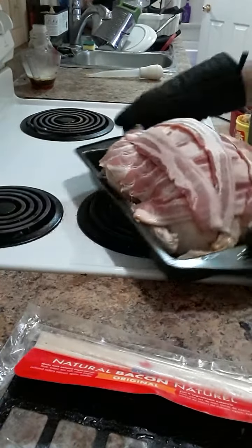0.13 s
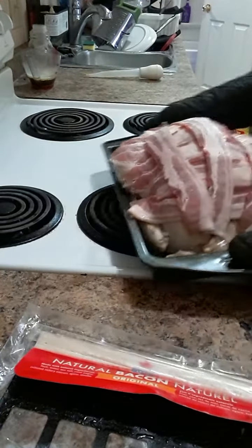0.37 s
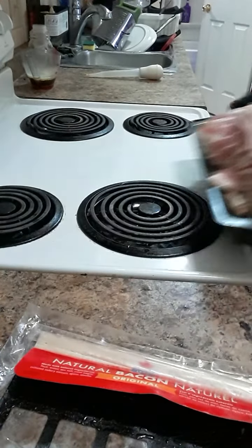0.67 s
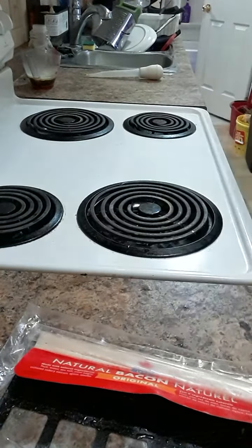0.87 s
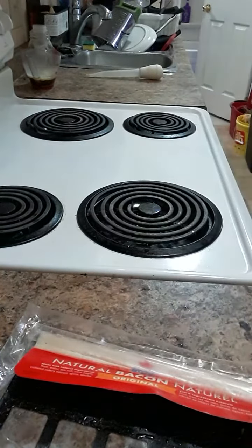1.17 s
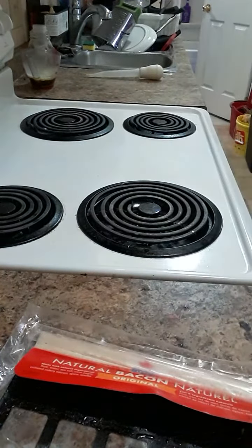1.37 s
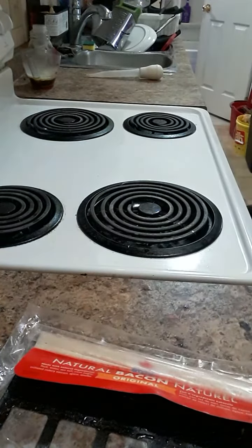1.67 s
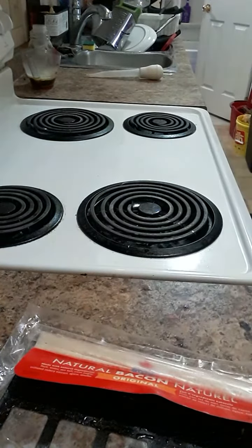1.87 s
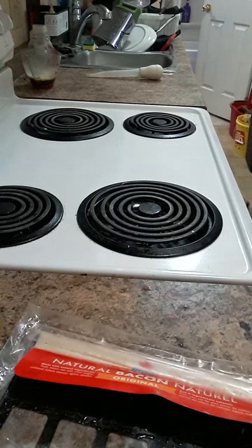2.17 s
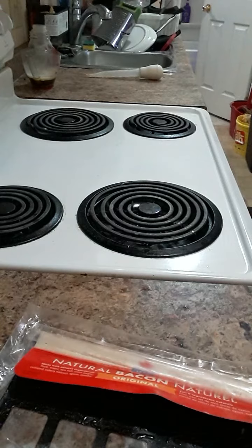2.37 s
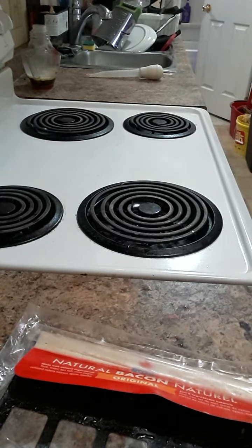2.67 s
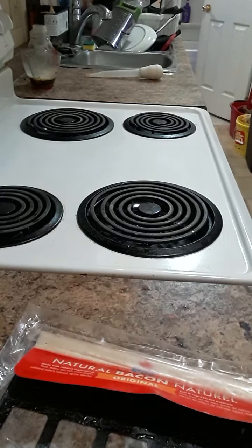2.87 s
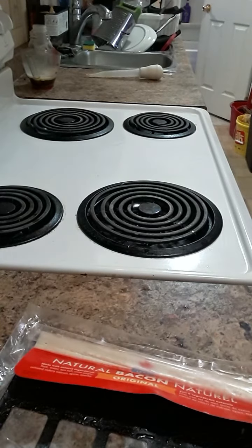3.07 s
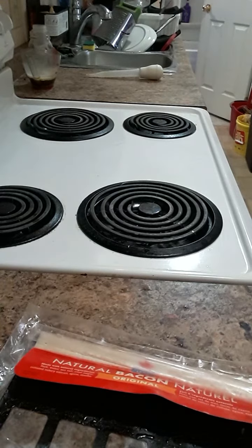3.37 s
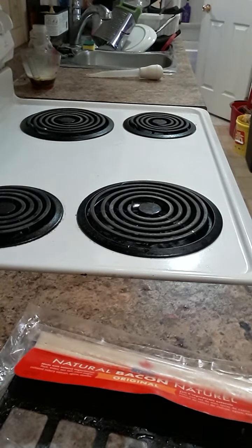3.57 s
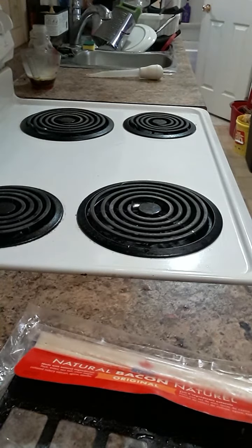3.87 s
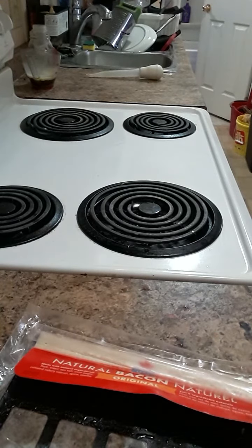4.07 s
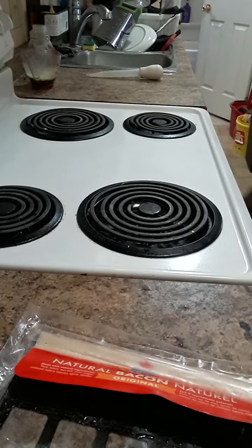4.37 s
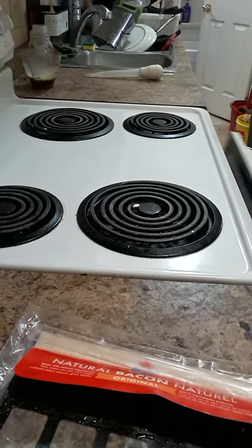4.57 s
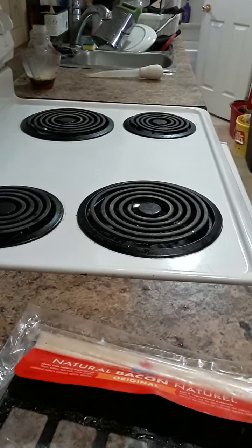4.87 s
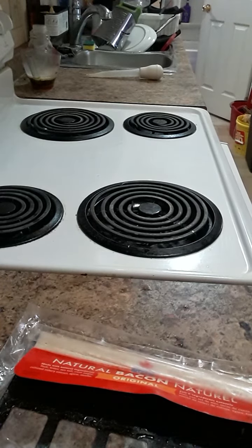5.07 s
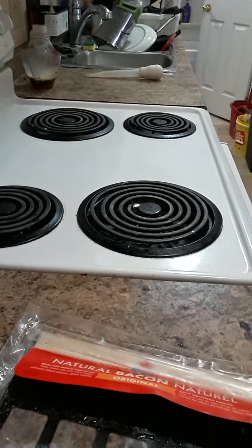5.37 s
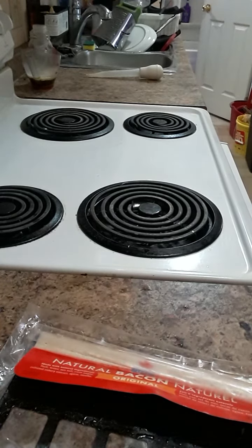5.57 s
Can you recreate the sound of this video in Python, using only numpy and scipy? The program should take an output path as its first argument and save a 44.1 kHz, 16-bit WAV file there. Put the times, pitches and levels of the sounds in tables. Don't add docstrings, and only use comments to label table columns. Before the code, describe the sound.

Close phone recording in stereo in a small kitchen with faint appliance hum. A metal pan drags gratingly off a stove coil, with a blunt counter tap. After a quiet gap it clatters onto the oven rack, thin steel ringing and the oven box booming, then slides with a soft hiss. Light ticks precede the oven door banging shut in several quick blows, whose panels ring briefly.

```python
import sys
import numpy as np
from scipy import signal
from scipy.fft import rfft, irfft, next_fast_len
from scipy.io import wavfile
from scipy.ndimage import uniform_filter1d

SR = 44100
rng = np.random.default_rng(int(sys.argv[2]) if len(sys.argv) > 2 else 0)


def output_pcm(signal):
    pcm = np.clip(np.atleast_2d(signal).T, -1, 1) * 32767
    wavfile.write(sys.argv[1], SR, np.round(pcm).astype(np.int16))


def decibels_to_gain(level_db):
    exponent = np.asarray(level_db, float) / 20
    return 10 ** exponent


N = 251811


def evened(x):
    return x / np.sqrt(np.mean(x ** 2) + 1e-20)


def read(points, at, column=1):
    table = np.transpose(points)
    return np.interp(np.log(at + 1), np.log(table[0] + 1), table[column])


def curve(rows):
    s, db = np.transpose(rows)
    return np.interp(np.arange(N) / SR, s, db, left=-120, right=-120)


def colour(x, db_of_hz):
    log_gain = np.log(decibels_to_gain(db_of_hz(abs(np.fft.fftfreq(4096, 1 / SR)))))
    taps = np.fft.ifft(np.exp(np.conj(signal.hilbert(log_gain)))).real[:2048]
    return signal.oaconvolve(x, taps.reshape((1,) * (x.ndim - 1) + (-1,)), axes=-1)[..., :N]


def split(x, hz):
    low = signal.sosfilt(signal.butter(2, hz, fs=SR, output="sos"), x)
    high = -signal.sosfilt(signal.butter(2, hz, "high", fs=SR, output="sos"), x)
    return low, high


def chatter(per_s, spread_db):
    size = decibels_to_gain(spread_db * np.minimum(rng.exponential(1, N), 4)) * rng.choice([-1., 1.], N)
    return evened(size * (rng.random(N) < per_s / SR))


def strike(force, rings):
    spot = rng.integers(0, len(rings), N) == np.arange(len(rings))[:, None]
    first, last = np.flatnonzero(force)[[0, -1]]
    size = next_fast_len(last + 1 - first + rings.shape[-1])
    blows = rfft((force * spot)[:, first:last + 1], size)[:, None]
    out = np.zeros((2, 2 * N))
    out[:, first:first + size] = irfft((blows * rfft(rings, size)).sum(0), size)
    return out[:, :N]


def ring(hz, db, t60):
    t = np.arange(SR // 2)[:, None] / SR
    apart = np.pi * np.clip(hz / 2460, 0, 1) * rng.uniform(-0.97, 1, len(hz))
    turns = 2 * np.pi * hz * t
    fade = decibels_to_gain(db - 60 * t / t60) / np.sqrt(t60)
    both = np.array([(fade * np.sin(turns)).sum(1), (fade * np.sin(turns + apart)).sum(1)])
    both = split(both, 0.61 * min(hz))[1]
    return both / np.linalg.norm(both[0])


# (frequency [Hz], left-right likeness [0..1])
PORT_LIKENESS = [(60, 1.), (300, 0.82), (550, 0.75), (1100, 0.75), (1650, 0.15), (5000, 0.029)]


def two_port_noise(same, a, b, c, d):
    left = a + 1j * b
    return left, same * left + np.sqrt(1 - same ** 2) * (c + 1j * d)


def steel(sheet, modes, count=6):
    hz = np.fft.rfftfreq(1024, 1 / SR)[:, None]
    same = np.clip(read(PORT_LIKENESS, hz), 0, 1)
    z = np.stack(two_port_noise(same, *rng.standard_normal((4, count, 513, 40))), axis=1)
    bumps = sum(decibels_to_gain(db - 8.5) / (1 + (2 * (hz - f) / width) ** 2) for f, width, db in modes)
    z = z * decibels_to_gain(read(sheet, hz)) * (1 + bumps)
    still = signal.istft(z, nperseg=1024, noverlap=768)[1][..., 1024:]
    hz, t, z = signal.stft(still, SR, nperseg=128)
    t60 = read(sheet, hz, column=2)[:, None]
    rings = signal.istft(z * decibels_to_gain(-60 * t / t60) / np.sqrt(t60), SR, nperseg=128)[1]
    rings = split(split(rings, 132)[1], 125)[1]
    return rings / np.sqrt((rings[:, 0] ** 2).sum(1).mean())


def clatter(hits, rise_s, sheet, modes, box, per_s, crest_db, hard_hz, edge_db):
    t = np.arange(SR // 2) / SR
    power = np.zeros((4, N + SR))
    for s, db, weight_db, hard_db, t60 in hits:
        shape = (1 - np.exp(-t / rise_s)) ** 2 * decibels_to_gain(-120 * t / t60)
        share_db = np.array([[0], [hard_db + 2.5], [2.1 * hard_db + edge_db], [weight_db + 0.5]])
        at = round(s * SR)
        power[:, at:at + len(t)] += decibels_to_gain(2 * (db - crest_db + share_db)) * shape / shape.max()
    clicks = chatter(per_s, spread_db=3.5)
    clicks[np.round((np.transpose(hits)[0] + rise_s) * SR).astype(int)] = 6.4
    force = np.sqrt(power[:, :N]) * clicks
    low, high = split(steel(sheet, modes), hard_hz)
    bodies = low, *split(high, 10000), ring(*np.transpose(box))[None]
    return sum(strike(f, b / np.linalg.norm(b[0, 0])) for f, b in zip(force, bodies))


# (time [s], peak [dB], weight into the box [dB], treble hardness [dB], t60 [s])
DOOR_HITS = [(4.556, -30.5, -2, -23, 0.34), (4.572, -28, -3, -10.5, 0.13), (4.586, -25.5, -4.5, -4, 0.056),
             (4.625, -37, -3, -22, .25), (4.66, -43, -3, -22, .15), (4.714, -25, -33, -19, 0.3),
             (4.733, -24.5, -20, -21, 0.18), (4.781, -10, -8, -13, 0.12), (4.791, -21, -14, -2, .1),
             (4.801, -13, -14, 1, 0.27), (4.817, -23.5, -16, 5.5, 0.18), (4.844, -13, -8, -17, 0.36),
             (4.896, -23, -12, -1, .1), (4.908, -14.5, -11, -1, 0.18), (4.93, -19, -6, -3.5, 0.27),
             (4.959, -21.5, -21, 3.5, 0.045)]
# (frequency [Hz], level [dB], t60 [s])
DOOR_STEEL = [(190, -5, 0.25), (292, 5.5, 0.17), (597, 8.5, 0.21), (1080, 6, 0.099), (2480, 0, 0.057),
              (5430, -0.5, 0.098), (9700, -1.5, 0.087), (16400, -12.5, 0.017)]
# (frequency [Hz], width [Hz], level [dB])
DOOR_MODES = [(470, 24, -12), (770, 40, -3), (910, 33, -12), (1160, 36, -1), (1750, 110, 9), (2250, 25, 6),
              (2350, 40, 4), (2940, 58, 11), (3730, 33, 11), (5230, 40, 3), (6120, 68, 7), (7285, 35, -2),
              (11900, 60, 3), (12783, 30, 6)]
# (frequency [Hz], level [dB], t60 [s])
FRAME = [(72.6, -8, 0.07), (92, 3.5, 0.15), (111, 4, 0.11), (124, 1, 0.13)]
# (frequency [Hz], level [dB], t60 [s])
BOX = [(157, -3, 0.35), (230.5, 4, 0.49), (263, 4.5, 0.11), (291.4, 7, 0.22), (307.5, 4.5, 0.2),
       (327, 0.5, 0.32), (390, -5, 0.52)]


def door_bang():
    return clatter(DOOR_HITS, 0.0035, DOOR_STEEL, DOOR_MODES, FRAME + BOX,
                   per_s=2600, crest_db=10, hard_hz=2830, edge_db=2)


def door_puff():
    start_s, length_s = 4.7812, 0.0017
    u = np.maximum(np.arange(N) / SR - start_s, 0) / length_s
    return decibels_to_gain(-8) * 2 * u * (1.5 - u) * np.exp(-u)


# (time [s], peak [dB], weight into the shelf [dB], treble hardness [dB], t60 [s])
PAN_HITS = [(1.95, -26, -1.5, -4.5, 0.4), (1.971, -21, -24, -3.5, 0.12), (1.989, -24.5, -21, -10, 0.39),
            (2.038, -26.5, -20, -21, .16), (2.065, -24.5, -9, -10, 0.43), (2.111, -20.5, -17, -6, 0.15),
            (2.133, -26, -24, -26, 0.089), (2.147, -26, -10, -9, 0.1), (2.163, -28, -10, -22, 0.092),
            (2.178, -31.5, -15, -12, .1), (2.191, -31, -22, -20, 0.33), (2.229, -32, -11, -11.5, 0.084),
            (2.267, -37, -18, -36, 0.48), (2.437, -36, -1, -16, 0.03), (2.903, -42, 5, 3.5, 0.084),
            (2.92, -47.5, -7, 1, .15)]
# (frequency [Hz], level [dB], t60 [s])
PAN_STEEL = [(250, 4, 0.031), (463, 4, 0.42), (1080, 2.5, 0.32), (1980, -1, 0.074), (3200, -5.5, 0.1),
             (4930, -5.5, 0.049), (8400, -8, 0.054), (15600, -19.5, 0.031)]
# (frequency [Hz], width [Hz], level [dB])
PAN_MODES = [(507, 28, 2), (707, 39, 9), (800, 28, 0.5), (860, 23, -6), (1065, 27, 9), (1380, 34, -1),
             (1700, 35, 4), (1880, 26, -7), (2650, 58, 3), (4040, 93, 5), (5650, 54, -23)]
# (frequency [Hz], level [dB], t60 [s])
SHELF = [(120.3, 2, 0.83), (146.7, 1.5, 0.26), (223, -11, 0.2), (282, -12, 0.39), (331.3, 4, 0.18),
         (403, -4, 0.18)]


def pan_landing():
    return clatter(PAN_HITS, 0.0067, PAN_STEEL, PAN_MODES, SHELF,
                   per_s=1800, crest_db=8.5, hard_hz=2700, edge_db=-3.5)


# (time [s], peak [dB], weight into the box [dB], treble hardness [dB], t60 [s])
SMALL_HITS = [(.598, -48, -37, -17, 0.29), (1.107, -57.5, -18, 0.5, 0.18), (1.59, -50, -7, -24, 0.26),
              (2.69, -40.5, -9, -11, 0.088), (2.862, -48, 6.5, -1, 0.21), (3.335, -48.5, -2, -16, 0.082),
              (3.582, -49, -26, -6.5, .18), (3.769, -39, -10.5, -11, 0.14), (4.161, -38.5, -24, -7, 0.07),
              (4.272, -45, -8, -4, .11), (4.29, -48, -16, -8.5, 0.47), (5.154, -54, 12, 3.5, 0.16),
              (5.592, -50, 4, -1, 0.08), (5.664, -42, -18, -4.5, 0.2)]


def small_bumps():
    return clatter(SMALL_HITS, 0.0039, PAN_STEEL, PAN_MODES, BOX,
                   per_s=5000, crest_db=8.0, hard_hz=2630, edge_db=0.5)


# (time [s], level [dB], frequency [Hz])
CLINKS = [(.404, -40, 469), (.432, -53, 3140), (1.258, -54, 995), (1.587, -48, 1200), (1.59, -50, 1500),
          (1.592, -52, 1740), (1.773, -47.5, 605), (1.96, -32.5, 507.3), (1.975, -29.5, 1065),
          (1.975, -32, 2035), (2.124, -29, 1040), (2.126, -29.5, 796), (2.14, -32, 850), (2.035, -35, 600),
          (2.93, -46.5, 3740), (3.34, -51, 470), (3.34, -56, 898), (3.588, -51.5, 1700), (3.775, -48, 702),
          (3.778, -50, 800), (3.775, -48, 1093), (3.959, -63, 2700), (4.301, -65, 1750),
          (4.557, -34.5, 510), (4.558, -37, 800), (4.569, -38, 386), (4.6, -38, 631), (4.57, -35, 1080),
          (4.557, -53, 1600)]
# (time [s], level [dB], frequency [Hz])
BOOMS = [(2.265, -35, 290), (2.859, -42, 159), (3.343, -47, 276), (3.872, -41.5, 121), (4.561, -33.5, 145),
         (4.59, -28, 134), (4.625, -29, 110.4), (4.783, -31, 68), (4.783, -25, 105), (4.798, -20, 263.5),
         (4.556, -35, 250), (4.602, -33, 114), (4.566, -49, 330), (3.778, -45, 141), (4.9, -23, 125),
         (4.59, -35.5, 260), (4.628, -34.5, 160), (1.97, -36, 320), (4.27, -50, 350), (5.09, -45, 230),
         (4.8, -30, 270), (5.682, -42, 108), (4.842, -25, 108), (4.96, -32, 97), (4.735, -43, 88),
         (4.7, -40, 120), (4.92, -30, 220), (5.27, -45, 280)]
# (time [s], level [dB], frequency [Hz])
TICKS = [(3.8, -55, 2800), (4.599, -48, 2600), (4.558, -52, 1700), (4.653, -54, 1500),
         (0.53, -61, 2400), (0.33, -48, 1050), (3.59, -53, 1150), (3.77, -60, 2900),
         (2.15, -35, 2300), (2.17, -41, 2700), (2.11, -44, 1900), (2.07, -42, 1900),
         (1.99, -46, 2300), (2.915, -54, 2700), (4.716, -44, 1800), (4.716, -38, 1500),
         (4.75, -39, 1900), (3.785, -46.5, 760), (4.17, -66, 3000), (5.59, -54, 1750),
         (5.59, -54, 1100), (5.66, -47, 2000), (5.67, -55, 2700), (5.67, -56, 1700),
         (4.725, -36, 1200)]
# (time [s], level [dB], frequency [Hz])
DOOR_CLINKS = [(4.72, -45, 2820), (4.721, -36.5, 570), (4.802, -30, 3725), (4.805, -35, 5964),
               (4.827, -23, 441), (4.83, -34, 5167), (4.831, -22.5, 1625), (4.839, -29, 2190),
               (4.844, -24, 6090), (4.849, -38, 4952), (4.853, -25, 6406), (4.897, -35, 2196),
               (4.898, -31.5, 915), (4.905, -30, 4980), (4.905, -28.5, 3720), (4.907, -38, 4457),
               (4.911, -29.5, 2050), (4.913, -33, 5609), (4.943, -35, 6233), (4.952, -30, 5178),
               (4.96, -32, 925), (4.966, -43, 5700), (4.79, -30, 2950)]
# (time [s], level [dB], frequency [Hz])
PAN_CLINKS = [(1.971, -33, 3860), (1.993, -43, 4263), (1.996, -34, 2030), (2.022, -45, 2830),
              (2.03, -30, 990), (2.058, -46, 5749), (2.059, -33, 533), (2.109, -49, 6061),
              (2.119, -47, 5727), (2.122, -42, 4060), (1.985, -34, 480), (2.135, -51, 6018),
              (2.234, -43, 1375), (2.254, -47, 1970), (2.265, -41.5, 523), (2.279, -47, 351)]
# (time [s], level [dB], frequency [Hz])
DRAG_CLINKS = [(.001, -42, 3410), (.001, -44, 2450), (0.044, -37, 1870), (.05, -51, 3000),
               (.055, -44, 2300), (.08, -41, 904), (.116, -35, 829), (.187, -43, 1080), (.232, -42, 759),
               (0.362, -39.5, 948), (.398, -52, 2600), (.4, -46, 1524), (.419, -56, 3150)]


def clinks():
    t = np.arange(SR // 4) / SR
    out = np.zeros((2, N + SR))
    rows = CLINKS + BOOMS + TICKS
    rows = rows + [(s, db - 2.0, hz) for s, db, hz in DOOR_CLINKS + PAN_CLINKS + DRAG_CLINKS]
    for (s, db, hz), (detune, beat, side) in zip(rows, rng.random((len(rows), 3))):
        t60 = min(0.13 * (1000 / hz) ** 0.2, 0.14)
        if db < -44 and hz > 900:
            t60 *= 0.5
        apart = np.array([[0], [np.pi * min(hz / 1500, 1) * (2 * side - 1)]])
        second_hz = hz + min(0.053 * hz, 56) * detune
        pair = np.sin(2 * np.pi * hz * t + apart)
        pair = pair + 1.02 * np.sin(2 * np.pi * (second_hz * t + beat) + apart)
        start = round(s * SR)
        out[:, start:start + len(t)] += decibels_to_gain(db - 60 * t / t60) * (1 - np.exp(-t / 0.0014)) * pair
    return out[:, :N]


def scrape(body, per_s):
    sheet = [(hz, db, 0.04) for hz, db in body]
    modes = [(829, 60, 0), (1376, 16, 0), (1870, 94, 0),  # (frequency [Hz], width [Hz], level [dB])
             (2300, 37, 0), (2950, 140, 0), (3430, 40, 0)]
    grains = chatter(per_s, spread_db=3.0)
    return strike(grains, steel(sheet, modes, count=10))


# (time at full pressure [s], level [dB], treble [dB], build [s], let-go [s])
DRAG = [
    (0.001, -38.5, -3.5, .1, 0.23),
    (0.4223, -40, -9, 0.08, 0.023),
    (0.364, -46.5, -14, 0.044, .02),
]
# (frequency [Hz], level [dB])
DRAG_BODY = [(200, -4), (450, -4.5), (850, 9), (1400, 5.5), (2000, -4), (3200, -6.5), (5000, -9),
             (16000, -21.5)]


def drag():
    rubbing = np.roll(scrape(DRAG_BODY, per_s=3000), -SR, axis=1)
    low, high = map(evened, split(rubbing, 2700))
    t, out = np.arange(N) / SR, 0
    for s, db, treble_db, build, let_go in DRAG:
        away = (t - s) / np.where(t < s, build, let_go)
        treble = decibels_to_gain(treble_db + 2.0 - 2.5 * np.minimum(away ** 2, 3))
        out = out + decibels_to_gain(db - 12.5 * away ** 2) * (decibels_to_gain(0.5) * low + treble * high)
    return out


# (frequency [Hz], level [dB], swell length [s], t60 [s])
KNOCK = [(239, -30, 0.027, 0.3), (470, -23, 0.016, 0.031), (570, -29.5, 0.025, 0.047),
         (790, -36, 0.025, 0.046), (1260, -27.5, 0.0046, 0.018), (1700, -29, 0.0027, .02)]


def knock():
    t = np.arange(SR // 5)[:, None] / SR
    hz, db, length, t60 = np.transpose(KNOCK)
    swell = np.sin(np.pi * np.minimum(t / length, 1))
    out = np.zeros(N)
    start = round(0.2755 * SR)
    out[start:start + len(t)] = (decibels_to_gain(db - 60 * t / t60) * swell * np.sin(2 * np.pi * hz * t)).sum(1)
    return out


# (time at the middle [s], level [dB], length [s], top-octave sheen [dB])
BRUSHES = [(0.828, -68, 0.12, 2), (1.25, -63.5, 0.18, -15), (1.627, -62, 0.31, -4), (1.82, -69, 0.083, 2),
           (2.91, -65, .08, 6), (3.437, -67, 0.045, -5), (3.508, -64, .059, -5), (3.616, -70, 0.15, 7),
           (3.927, -56, 0.11, -2), (4.21, -59, 0.12, -8), (4.3, -76.5, 0.66, 9), (4.745, -73, .08, 10),
           (1.75, -79.5, .5, 7), (5.179, -68, 0.12, 22), (5.351, -55.5, 0.076, -28),
           (5.524, -54, .16, -3.5)]


def brushes():
    t = np.arange(N) / SR
    swell = sum(decibels_to_gain(db + np.array([[0], [sheen_db]])) * np.exp(-(2 * (t - s) / length) ** 2)
                for s, db, length, sheen_db in BRUSHES)
    # (frequency [Hz], level [dB])
    cloth = [(300, -31), (1500, -0.5), (3500, -4.5), (5500, -1.5), (16000, -7.0)]
    low, high = split(evened(scrape(cloth, per_s=6000)), 7600)
    return swell[0] * low + swell[1] * high


# (time [s], movement [dB])
RUSTLE = [(0.45, -80), (.6, -72.5), (.9, -72), (1.27, -69.5), (1.68, -74), (1.93, -68), (2.3, -59.5),
          (2.45, -55.5), (2.85, -56.5), (3.05, -63.5), (3.45, -73), (3.8, -62), (4.2, -67.5), (4.6, -62.5),
          (5.08, -49), (5.2, -61), (5.72, -60.5)]
# (frequency [Hz], level [dB])
RUSTLE_BODY = [(300, 14), (700, 10), (1500, 7.5), (3000, 0), (6000, 0), (16000, -4.5)]
# (frequency [Hz], level [dB], t60 [s])
RACK = [(152, 1.5, 0.81), (271.3, -0.5, 0.22), (329, 0.5, 0.53), (386, -2.5, 0.11), (538, -24, 0.24),
        (626.6, -9, 0.4), (798.5, -6, 0.21), (1014, -11.5, 0.79), (1340, -14, 0.49)]
# (time [s], level [dB], hold [s], dying [dB per s])
SHAKES = [
    (0.498, -78, 0.23, 4),
    (2.18, -48, 0.54, 47),
    (3.305, -47, 0.022, 75),
    (3.774, -58, 0.98, 25),
    (4.946, -45, 0.24, 32),
]


def rustle():
    t, move_db = np.arange(N) / SR, curve(RUSTLE)
    hiss, swish = split(scrape(RUSTLE_BODY, per_s=5000), 6600)
    rack = strike(chatter(900, spread_db=-2.0), ring(*np.transpose(RACK))[None])
    swish_db = 0.46 * move_db - 50.5 + 9.5
    slide = decibels_to_gain(move_db + 2.0) * evened(hiss) + decibels_to_gain(swish_db) * evened(swish)
    shake = sum((t > s) * decibels_to_gain(db - dying_db * np.maximum(t - s - hold, 0))
                for s, db, hold, dying_db in SHAKES)
    return slide + decibels_to_gain(-4.5) * (shake + decibels_to_gain(-67)) * rack


# (time [s], level [dB], frequency [Hz], t60 [s])
SINGING = [
    (2.2, -47, 331.6, 3.8),
    (2.25, -47.5, 277, 1.8),
    (2.18, -42, 120.3, 0.94),
    (5.0, -41.5, 282, 1.45),
    (5.0, -41.5, 231.3, 0.95),
    (5.15, -47, 146.8, 2.5),
]


def singing():
    t, out = np.arange(SR) / SR, np.zeros(N + SR)
    for s, db, hz, t60 in SINGING:
        drift, swell = (evened(uniform_filter1d(uniform_filter1d(v, 1500), 1500))
                        for v in rng.standard_normal((2, SR)))
        turns = np.cumsum(hz + 4.5 * drift) / SR
        shape = decibels_to_gain(db - 60 * t / t60 + 4 * swell)
        shape = shape * np.minimum(t / 0.028, 1) * np.clip((0.85 - t) / 0.093, 0, 1)
        start = round(s * SR)
        out[start:start + SR] += shape * np.sin(2 * np.pi * turns)
    return out[:N]


# (frequency [Hz], t60 [s])
KITCHEN = [(100, 0.6), (500, 0.34), (2000, 0.27), (6000, 0.28), (16000, 0.2)]


def kitchen(x):
    taps = np.zeros((2, SR))
    at = np.arange(200, SR - 20, 20) + rng.integers(0, 20, (2, (SR - 201) // 20))
    np.put_along_axis(taps, at, rng.choice([-1., 1.], at.shape), 1)
    hz, t, z = signal.stft(taps, SR, nperseg=256)
    tail = signal.istft(z * decibels_to_gain(-60 * t / read(KITCHEN, hz)[:, None]), SR, nperseg=256)[1]
    tail = split(tail[:1], 560)[0] + split(split(tail, 620)[1], 460)[1]
    return signal.fftconvolve(x, tail / np.linalg.norm(tail[0]), axes=1)[:, :N]


# (frequency [Hz], level [dB per Hz])
HUM = [(26, -37), (45, -12.5), (120, 4.5), (159, -2.5), (204, -20), (371, -5.5), (450, -11.5), (686, -16.5),
       (775, -13.5), (941, -18.5), (1270, -20), (2350, -34.5), (3000, -41), (3900, -69), (6600, -120)]


def hum():
    frames, hz = N // 512 + 5, np.fft.rfftfreq(2048, 1 / SR)
    a, b, c, d, patches = rng.standard_normal((frames, 1025, 5)).T
    patches = evened(uniform_filter1d(uniform_filter1d(patches, size=6, axis=0), size=5, axis=1))
    same = np.clip(read(PORT_LIKENESS, hz), -1, 1)[:, None]
    z = np.array(two_port_noise(same, a, b, c, d))
    z *= decibels_to_gain(read(HUM, hz)[:, None] + 1.5 * patches)
    noise = signal.istft(z, nperseg=2048, noverlap=1536)[1][:, :N]
    return decibels_to_gain(-54 + 1.5) * evened(noise)


# (frequency [Hz], level [dB])
MAINS = [(48.4, -64.5)]


def mains():
    t = np.arange(N) / SR
    return sum(decibels_to_gain(db + 9.5) * np.sin(2 * np.pi * (hz * t + rng.random())) for hz, db in MAINS)


def scene():
    tap = knock()
    near = door_bang() + door_puff() + pan_landing() + small_bumps()
    near = near + clinks() + drag() + decibels_to_gain(-5.0) * tap + brushes()
    room = decibels_to_gain(-9.0) * kitchen(near)
    return near + room + decibels_to_gain(3.5) * tap + rustle() + singing() + hum() + mains()


def top_cut(x):
    return signal.sosfilt(signal.butter(12, 15830, fs=SR, output="sos"), x)


# (frequency [Hz], left [dB], right [dB])
PORTS = [(30.6, -23, -22.5), (88, -0.5, 0), (2750, 3, 3), (4570, -5, 1), (5820, -12.5, 3.5),
         (6690, -19, -1.5), (7650, -25, -11), (9440, -42, -20.5), (10600, -42, -10.5), (12300, -24, -0.5),
         (16100, -8, 1)]
# (frequency [Hz], level [dB])
SELF_NOISE = [(100, -50), (3000, -5), (8500, -11.5), (15500, -7)]


def record(dry):
    ports = np.array([colour(dry[k], lambda hz: read(PORTS, hz, column=k + 1)) for k in range(2)])
    ports[1] = np.roll(ports[1], 12)
    hiss = evened(colour(rng.standard_normal((2, N)), lambda hz: read(SELF_NOISE, hz)))
    edge = signal.firwin(1023, 15780, window=("kaiser", 9), fs=SR)[None]
    mix = signal.oaconvolve(ports + decibels_to_gain(-73.5) * hiss, edge, "same", axes=1)
    return top_cut(mix)


dry = scene()
out = record(dry)
output_pcm(out)
```